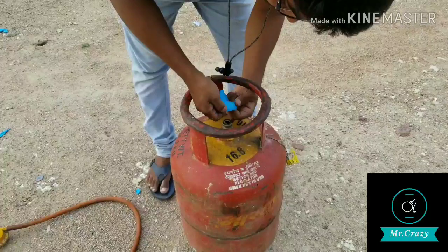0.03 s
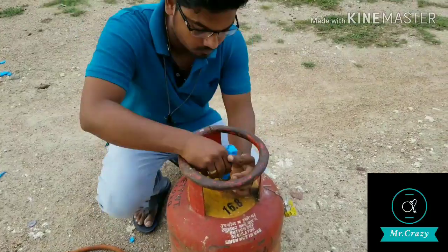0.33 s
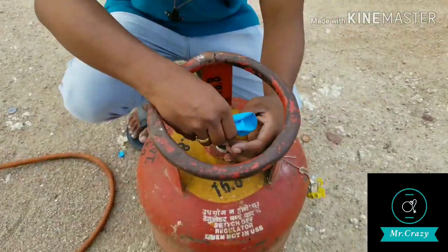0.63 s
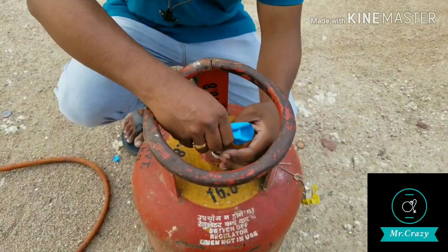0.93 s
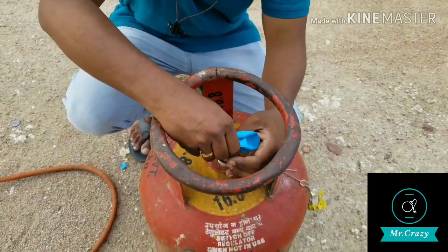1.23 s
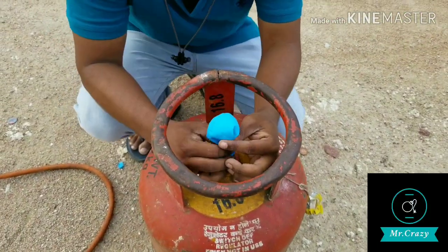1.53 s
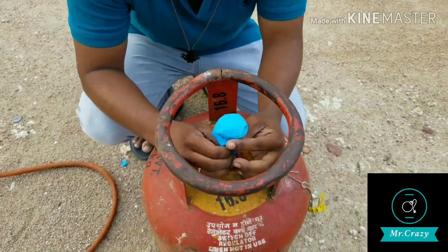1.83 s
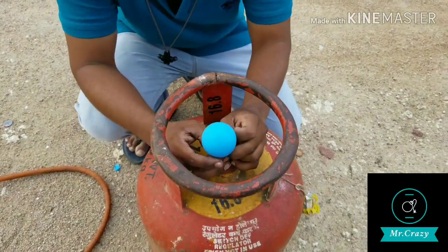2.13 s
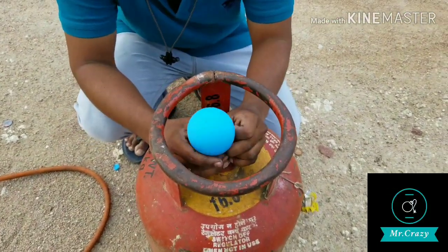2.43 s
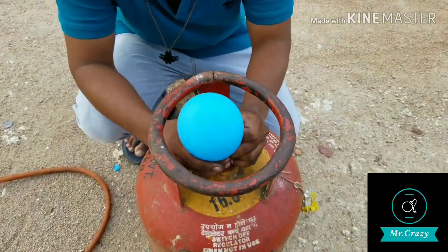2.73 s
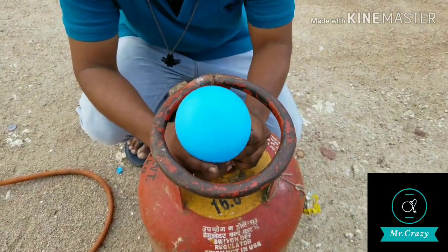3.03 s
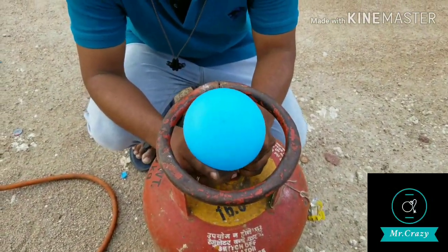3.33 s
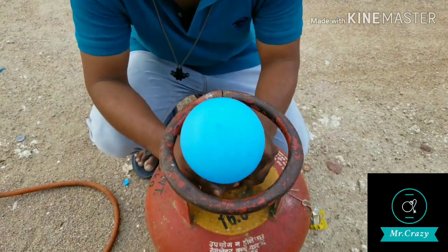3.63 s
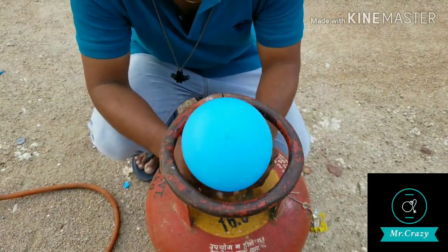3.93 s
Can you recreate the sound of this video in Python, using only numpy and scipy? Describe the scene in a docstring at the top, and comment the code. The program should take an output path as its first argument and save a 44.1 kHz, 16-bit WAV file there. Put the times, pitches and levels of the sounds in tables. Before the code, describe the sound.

A close, fluttering hiss of gas filling a balloon from a cylinder. It follows quiet finger clicks and short rubber rubs in the open air, with faint birds behind, and its resonance falls as the balloon swells.

```python
"""Outdoors, a rubber balloon is filled from a gas cylinder.
First, over low rumble, a distant wash and small birds, fingers stretch the balloon over the valve:
ticks, rustle and short rubs. Near 2.1 s the background fades briefly and returns with a far idling engine.
From 2.2 s the valve leaks; at 2.4 s it opens and a turbulent jet hisses into the balloon,
whose resonances sink as it swells."""
import sys
import numpy as np
from scipy import signal
from scipy.fft import rfft, irfft
from scipy.io import wavfile
from scipy.ndimage import uniform_filter1d

SR = 44100
rng = np.random.default_rng(int(sys.argv[2]) if len(sys.argv) > 2 else 0)


def bounce(signal):
    """Save signal as a 16-bit WAV file at the path given by the first command-line argument."""
    frames = np.transpose(np.atleast_2d(signal))
    limited = np.clip(frames, -1, 1)
    pcm = np.round(limited * 32767).astype(np.int16)
    wavfile.write(sys.argv[1], SR, pcm)


N = 176400
FFT_SIZE, HOP = 1024, 256
TIME_S = np.arange(N) / SR
FRAME_S = np.arange(N // HOP + 5) * HOP / SR
BIN_HZ = np.fft.rfftfreq(FFT_SIZE, 1 / SR)

# open air, distant wash: freq_hz, density_db
AIR_SPECTRUM = [(15, -37), (25, -33), (82, -0.5), (164, -1.5), (221, -5.5), (281, -15), (421, -24.5),
                (523, -28), (1200, -23.5), (1450, -24), (2700, -38), (4150, -30.5), (4870, -44),
                (6210, -40.5), (8580, -48), (10900, -48), (15500, -53.5)]
WASH_SPECTRUM = [(400, -26), (850, -6), (1200, 8.5), (1550, -9), (2000, 1), (2800, -35.5), (8000, -47)]
# open air, left to right: freq_hz, correlation
AIR_CORRELATION = [(60, 0.94), (180, 1), (550, 0.7), (1650, -0.4), (4970, -0.31), (15000, -0.54)]
# open air, its share below 160 Hz, wash, engine: time_s, gain_db
AIR_ENVELOPE = [(0, -2), (.35, -2), (.7, 0.5), (1.3, 1.5), (2.0, 0), (2.09, -6.5), (2.14, -28), (2.19, -16),
                (2.28, 3.5), (2.37, 3), (2.7, 0.5), (3.05, 0.5), (3.25, -5.5), (4.0, -4.5)]
RUMBLE_ENVELOPE = [(0, -0.5), (2.3, 2), (3.0, -0.5), (3.25, -25.5), (4.0, -13)]
WASH_ENVELOPE = [(0, -72.5), (.4, -64), (.63, -59), (.8, -63.5), (1.1, -67), (1.5, -73), (2.0, -71)]
ENGINE_ENVELOPE = [(2.15, -78.5), (2.3, -39.5), (2.7, -52.5), (3.05, -50.5), (3.25, -63.5), (4.0, -64)]
# engine tones: firing_multiple, gain_db
ENGINE_HARMONICS = [(2, -6), (3, -10.5), (4, -14.5), (5, -13.5), (6, -16.5)]
# rising bird notes: start_s, length_s, level_db, pitch_hz
BIRD_WHISTLES = [(0.112, 0.048, -62.5, 4100), (0.526, 0.077, -73, 3640), (0.595, 0.033, -60, 4130),
                 (0.824, 0.041, -61.5, 4090), (1.294, 0.047, -66, 4120), (1.52, .06, -71, 5410),
                 (1.527, .065, -64, 4110), (2.028, 0.038, -69, 4140)]
# falling bird notes: centre_s, level_db, pitch_hz
BIRD_CHIPS = [(.046, -64, 6500), (.068, -70, 3800), (.184, -64, 3750), (.475, -66, 4220),
              (.875, -61.5, 4440), (.90, -69, 6100), (.906, -64, 4450), (.975, -65, 4240),
              (1.015, -67, 5450), (1.178, -69, 3240), (1.203, -62.5, 3460), (1.476, -65, 5440),
              (1.493, -62, 3470), (1.835, -65, 3340), (1.863, -64, 3600), (1.893, -59, 3480),
              (1.908, -59, 3050)]

# rubber slips: start_s, length_s, level_db, ring_hz, ring_share, treble_db
RUBBER_SLIPS = [(1.337, 0.012, -44, 1170, 0.32, 4), (1.347, 0.013, -40, 4530, 0.03, 19),
                (1.367, 0.019, -39.5, 2000, 0.35, -10), (1.932, 0.02, -22.5, 3250, 0.25, 2),
                (1.942, 0.02, -40, 2960, 0.16, 13), (1.973, 0.017, -39, 1707, 0.25, -5)]
# fingers on the valve: start_s, level_db, t60_s
FINGER_TICKS = [(0.034, -43, 0.013), (0.283, -55, 0.029), (.303, -58, 0.033), (.318, -55, .025),
                (0.4935, -51, 0.023), (0.5176, -53.5, 0.016), (.562, -60, .015), (0.633, -63, .015),
                (.8959, -68, .015), (1.016, -62, .015), (1.106, -71, .015)]
# hands on rubber: time_s, level_db
RUSTLE_ENVELOPE = [(0, -73), (.2, -73), (.33, -62.5), (.42, -73.5), (.5, -71), (.7, -80), (.95, -73.5),
                   (1.1, -82), (1.45, -74), (1.7, -85), (1.9, -69.5), (2.0, -66)]
# handling noises: freq_hz, density_db
RUB_SPECTRUM = [(180, -56.5), (300, -28), (731, -34.5), (1640, -9.5), (2100, -15), (3340, -4.5),
                (3870, -2.5), (8140, -14.5), (9140, -24), (10400, -9.5), (15500, -13)]
TICK_SPECTRUM = [(300, -5), (1800, -0.5), (5500, 2), (9000, -10), (11500, -9), (15500, -21)]
RUSTLE_SPECTRUM = [(300, -19.5), (1500, 8), (3500, 5.5), (7000, 2), (9000, -37), (11000, -7.5),
                   (15500, -21.5)]

# jet strength, its treble shelf: time_s, gain_db
JET_ENVELOPE = [(2.2, -77), (2.225, -77), (2.258, -53), (2.33, -45.5), (2.378, -39), (2.395, -23),
                (2.412, -16), (2.63, -15), (2.69, -17.5), (2.75, -20), (2.87, -21.5), (2.96, -20),
                (3.04, -23), (3.2, -22.5), (3.26, -28), (3.33, -25.5), (3.38, -27), (3.5, -24.5),
                (3.69, -27), (3.72, -22), (3.76, -24.5), (3.82, -22), (3.91, -26.5), (3.96, -27),
                (4.0, -25)]
JET_TREBLE = [(2.25, -0.5), (2.37, -7), (2.42, -2.5), (2.5, -0.5), (2.62, 1.5), (2.69, -2.5), (2.76, -4),
              (3.0, -4), (3.2, -0.5), (3.35, 1.5), (3.68, 2.5), (3.8, 4), (4.0, 2.5)]
# hiss in the slack and taut balloon: freq_hz, density_db
SLACK_SPECTRUM = [(180, -62), (300, -31.5), (769, -20.5), (1280, -8.5), (1490, -5), (1780, -7.5),
                  (2440, -4.5), (2650, -4), (3280, -2.5), (4490, -4), (5660, -6), (6250, -3.5), (7250, -7),
                  (9140, -15), (11100, -1.5), (13600, -11), (15500, -5.5)]
TAUT_SPECTRUM = [(180, -54), (300, -26.5), (696, -22), (892, -14.5), (1590, -7.5), (2140, -0.5),
                 (2440, -5.5), (2930, -4.5), (3230, -5.5), (4140, -5.5), (5210, -9), (5570, -5.5),
                 (7370, -11.5), (8420, -20), (9930, -16), (11100, -6.5), (15500, -10.5)]
# rubber stretch: time_s, taut_fraction
BALLOON_STRETCH = [(2.4, 0), (2.62, 0), (2.76, 0.51), (3.05, 0.66), (3.3, 0.7), (4.0, 1)]
# strongest resonance of the enclosed gas: time_s, freq_hz
MAIN_MODE = [(2.37, 7330), (2.47, 6670), (2.55, 5870), (2.65, 5400), (2.8, 5076), (3.0, 4800), (3.2, 4540),
             (3.4, 4300), (3.6, 4110), (4.0, 3950)]
# balloon resonances: main_mode_ratio, width_hz, lift_db
BALLOON_MODES = [(.38, 161, 5), (0.509, 180, 4), (0.708, 200, 7.5), (0.862, 140, 6.5), (.935, 159, 1.5),
                 (1.0, 169, 10.5), (1.09, 180, 6), (1.19, 150, 5.5), (1.28, 160, 7), (1.37, 170, 6.5),
                 (1.46, 160, 3.5), (1.61, 180, 2.5), (1.7, 160, -6), (1.77, 200, 6), (1.95, 200, 3),
                 (2.14, 220, 2.5), (2.28, 220, 2)]
# passing peaks and a dip, sinking with the modes: centre_s, length_s, centre_hz, width_hz, lift_db
MODE_FLARES = [(2.31, 0.34, 2640, 200, 2.5), (2.305, .2, 3920, 300, -8), (2.425, 0.14, 3670, 300, 8.5),
               (2.432, 0.049, 7440, 400, 12), (2.473, 0.062, 4500, 250, 10), (2.712, 0.19, 4380, 302, 11),
               (2.98, 0.091, 6330, 400, 13), (3.02, 0.76, 4740, 161.3, 7), (3.3, .4, 5900, 200, 0.5),
               (3.507, 0.092, 4360, 298, 10.5), (3.78, 0.17, 4200, 300, 6.5),
               (3.814, 0.16, 4760, 200, 17.5), (3.824, 0.13, 5060, 220, 11), (3.99, 0.031, 4400, 400, 13.5)]
# peaks and notches of valve, collar and cupped hands: centre_hz, width_hz, lift_db
COLLAR_MODES = [(560, 250, 1), (900, 120, 2), (1370, 200, 3), (1640, 220, -4), (2170, 180, 4),
                (2400, 150, -5), (2900, 200, 2), (3170, 180, -3), (4050, 160, 2), (5170, 200, 2),
                (5700, 260, -6), (7200, 500, 2), (9100, 1200, -3), (10750, 600, 3), (13500, 900, -2)]
# hiss, left to right: freq_hz, correlation (clipped to 1)
HISS_CORRELATION = [(200, 4.8), (500, 0.6), (1000, 1.03), (2000, 0.44), (4000, 0.47), (7000, 0.24),
                    (12000, 0)]
# hiss balance: freq_hz, left_minus_right_db
HISS_BALANCE = [(60, 1.0), (99, 1.5), (160, 2.0), (270, 1.0), (450, 1.0), (740, 3), (1220, 3.2),
                (2010, 3.7), (3330, 7.4), (5500, 7), (9080, 4.5), (15000, 0.83)]
# hiss drift: time_s, left_minus_right_db
HISS_DRIFT = [(2.3, 1), (2.45, -0.5), (2.62, -.5), (2.75, 0), (3.0, -1), (3.3, -2), (4.0, -2.5)]


def amp(db):
    """Decibels to gain."""
    return 10 ** (np.asarray(db) / 20)


def unit(x):
    """Scale to rms 1."""
    return x / np.sqrt(np.mean(x ** 2) + 1e-20)


def at_time(table, time_s, outside=None):
    """Interpolate rows of time_s, value."""
    return np.interp(time_s, *np.transpose(table), left=outside, right=outside)


def at_freq(table, hz=BIN_HZ):
    """Interpolate rows of freq_hz, value on a log axis."""
    freq_hz, value = np.transpose(table)
    return np.interp(np.log(hz + 1), np.log(freq_hz + 1), value)


def add(mix, start_s, sound):
    """Mix a sound in at start_s."""
    part = mix[:, max(round(start_s * SR), 0):][:, :sound.shape[-1]]
    part += sound[..., :part.shape[1]]


def wobble(cutoff_hz):
    """Low-passed noise, rms 1."""
    rolloff = 1 + (np.fft.rfftfreq(N, 1 / SR) / cutoff_hz) ** 4
    return unit(irfft(rfft(rng.standard_normal(N)) / rolloff, N))


def noise(shape_db, correlation, pan_db, patch_db):
    """Steady stereo noise with random time-frequency patches; mid channel at rms 1."""
    a, b, c, d, patches = rng.standard_normal((5, len(FRAME_S), len(BIN_HZ)))
    patches = unit(uniform_filter1d(uniform_filter1d(patches, size=9, axis=0), size=9, axis=1))
    correlation = np.clip(correlation, -1, 1)
    left = a + 1j * b
    right = correlation * left + np.sqrt(1 - correlation ** 2) * (c + 1j * d)
    gain = amp(shape_db + patch_db * patches) * np.ones((2, 1, 1))
    gain /= np.sqrt((gain ** 2).mean((0, 2), keepdims=True))
    spectra = gain * np.array([left * amp(pan_db / 2), right * amp(-pan_db / 2)])
    x = signal.istft(spectra.transpose(0, 2, 1), nperseg=FFT_SIZE, noverlap=FFT_SIZE - HOP)[1][:, :N]
    return x / x.mean(0).std()


def burst(spectrum, samples, treble_db=0, correlation=0.56):
    """Short stereo noise with a 9 kHz shelf, rms 1."""
    hz = np.fft.rfftfreq(samples, 1 / SR)
    shape_db = at_freq(spectrum, hz) + treble_db * hz ** 4 / (hz ** 4 + 9000 ** 4)
    a, b = irfft(rfft(rng.standard_normal((2, samples))) * amp(shape_db), samples)
    return unit(np.array([a, correlation * a + np.sqrt(1 - correlation ** 2) * b]))


def open_air():
    """Low rumble and a distant wash near 1.2 kHz."""
    rumble_db = at_time(RUMBLE_ENVELOPE, FRAME_S)[:, None] / (1 + (BIN_HZ / 160) ** 6)
    air = noise(at_freq(AIR_SPECTRUM) + rumble_db, at_freq(AIR_CORRELATION), pan_db=2, patch_db=1.5)
    air *= amp(at_time(AIR_ENVELOPE, TIME_S) - 50.5)
    wash = noise(at_freq(WASH_SPECTRUM), correlation=0.36, pan_db=2, patch_db=2.5)
    return air + wash * amp(at_time(WASH_ENVELOPE, TIME_S, outside=-120))


def engine(firing_hz=51.4, waver=0.0033):
    """Distant idle: harmonics of a wavering firing rate."""
    cycles = np.cumsum(firing_hz * (1 + waver * wobble(5.5))) / SR
    hum = sum(amp(db) * np.sqrt(2) * np.sin(2 * np.pi * (k * cycles + rng.random()))
              for k, db in ENGINE_HARMONICS)
    return hum * amp(at_time(ENGINE_ENVELOPE, TIME_S, outside=-120) + 2 * wobble(8.5))


def chirp(length_s, level_db, pitch_hz, glide_hz):
    """One bird note: a sine gliding through pitch_hz."""
    progress = np.arange(0, length_s, 1 / SR) / length_s
    cycles = np.cumsum(pitch_hz + glide_hz * (progress - .5)) / SR
    return amp(level_db) * np.sqrt(2) * np.sin(np.pi * progress) * np.sin(2 * np.pi * cycles)


def birds(chip_s=0.012, fall_hz=600, twitter_notes=56, twitter_s=1.9):
    """Thin whistles, short chips and a faint, high twitter."""
    out = np.zeros((2, N))
    for start_s, length_s, level_db, pitch_hz in BIRD_WHISTLES:
        add(out, start_s, chirp(length_s, level_db, pitch_hz, glide_hz=132))
    for centre_s, level_db, pitch_hz in BIRD_CHIPS:
        add(out, centre_s - chip_s / 2, chirp(chip_s, level_db, pitch_hz, -fall_hz))
    for k, (late, loud, high) in enumerate(rng.uniform(-1.1, 1, (twitter_notes, 3))):
        start_s = (k + 1 + late / 2) * twitter_s / twitter_notes
        add(out, start_s, chirp(chip_s, -72 + 3 * loud, 5200 + 1000 * high, -fall_hz))
    return out


def scatter(x, echo_db=-4, t60_s=0.25):
    """Echoes off ground and trees blur a distant sound."""
    t = TIME_S[:SR // 4]
    tail = rng.standard_normal((2, len(t))) * amp(-60 * t / t60_s)
    tail /= np.linalg.norm(tail, axis=1, keepdims=True)
    return x + amp(echo_db) * signal.oaconvolve(x, tail, axes=1)[:, :N]


def rubs(wander_hz=316, overtone=0.29):
    """Rubber slips on the valve: friction noise plus an unsteady ring."""
    out = np.zeros((2, N))
    t = TIME_S[:2048]
    for start_s, length_s, level_db, ring_hz, share, treble_db in RUBBER_SLIPS:
        grit = burst(RUB_SPECTRUM, len(t), treble_db)
        wander = unit(uniform_filter1d(rng.standard_normal(len(t)), size=24))
        phase = 2 * np.pi * np.cumsum(ring_hz + wander_hz * wander) / SR
        ring = unit(np.sin(phase) + overtone * np.sin(2 * phase))
        swell = np.sin(np.pi * np.minimum(t / length_s, 1))
        add(out, start_s, amp(level_db) * swell * (np.sqrt(1 - share) * grit + np.sqrt(share) * ring))
    return out


def ticks():
    """Fingers tap the valve: fast-decaying noise bursts."""
    out = np.zeros((2, N))
    t = TIME_S[:2048]
    for start_s, level_db, t60_s in FINGER_TICKS:
        add(out, start_s, burst(TICK_SPECTRUM, len(t)) * amp(level_db - 60 * t / t60_s))
    return out


def rustle(flicker_db=3.6):
    """Hands brush the rubber: faint, flickering noise."""
    friction = noise(at_freq(RUSTLE_SPECTRUM), correlation=0.2, pan_db=0, patch_db=2.5)
    return friction * amp(at_time(RUSTLE_ENVELOPE, TIME_S, outside=-120) + flicker_db * wobble(150))


def peak(centre_hz, width_hz):
    """Resonance curve of height 1."""
    return 1 / (1 + (2 * (BIN_HZ - centre_hz) / width_hz) ** 2)


def ripple(position):
    """Random spectral peaks and dips, one value per unit of position, half shared by the channels."""
    shared, *sides = rng.standard_normal((3, FFT_SIZE))
    return np.array([np.interp(position, np.arange(FFT_SIZE), (shared + side) / np.sqrt(2))
                     for side in sides])


def hiss_spectrum_db(shelf_hz=5850, slack_ring=0.68, comb_hz=55, final_spacing_hz=100):
    """Balloon resonances sink as it swells; those of the collar stay put."""
    main_hz = at_time(MAIN_MODE, FRAME_S)[:, None]
    taut = at_time(BALLOON_STRETCH, FRAME_S)[:, None]
    db = (1 - taut) * at_freq(SLACK_SPECTRUM) + taut * at_freq(TAUT_SPECTRUM)
    db -= 10 * np.log10(1 + (200 / (BIN_HZ + 1)) ** 4)  # 200 Hz high-pass
    db += at_time(JET_TREBLE, FRAME_S)[:, None] / (1 + (shelf_hz / (BIN_HZ + 1)) ** 8)
    ringing = slack_ring + (1 - slack_ring) * np.minimum(2 * taut, 1)
    db += ringing * sum(lift_db * peak(k * main_hz, width_hz) for k, width_hz, lift_db in BALLOON_MODES)
    db += sum(lift_db * peak(hz, width_hz) for hz, width_hz, lift_db in COLLAR_MODES)
    for centre_s, length_s, hz, width_hz, lift_db in MODE_FLARES:
        swell = np.exp(-(2 * (FRAME_S[:, None] - centre_s) / length_s) ** 2)
        db += lift_db * swell * peak(hz * main_hz / at_time(MAIN_MODE, centre_s), width_hz)
    spacing_hz = final_spacing_hz * main_hz / MAIN_MODE[-1][1]
    weak_modes_db = 2.8 * ripple(BIN_HZ / spacing_hz)
    comb_db = 1.8 * ripple(BIN_HZ[None] / comb_hz)  # reflections off hands, collar and tank
    return db + (weak_modes_db + comb_db) * BIN_HZ / (BIN_HZ + 1000)


def spits(rate_per_s=350, spread_db=8, decay_s=0.0012):
    """The jet spits: tiny random bursts, rms 1."""
    impulses = (rng.random(N) < rate_per_s / SR) * amp(spread_db * np.minimum(rng.exponential(1, N), 4))
    t = TIME_S[:256]
    grain = burst(SLACK_SPECTRUM, len(t)) * np.exp(-t / decay_s)
    return unit(signal.oaconvolve(impulses[None], grain, axes=1)[:, :N])


def gas_jet(flutter_db=0.84, flutter_hz=35.2, sputter_db=0.5, sputter_hz=910, spit_db=-22.5):
    """Turbulent gas hisses through collar and balloon, fluttering and spitting."""
    hiss = noise(hiss_spectrum_db(), at_freq(HISS_CORRELATION), at_freq(HISS_BALANCE), patch_db=1.62)
    hiss *= amp(flutter_db * wobble(flutter_hz) + sputter_db * wobble(sputter_hz))
    pan = amp(at_time(HISS_DRIFT, TIME_S) * np.array([[.5], [-.5]]))
    flow = amp(at_time(JET_ENVELOPE, TIME_S)) * (TIME_S > JET_ENVELOPE[0][0])
    return (hiss + amp(spit_db) * spits()) * pan * flow


def scene():
    """Stereo mix; hands 4 dB to the left."""
    gas = gas_jet()
    hands = (rubs() + ticks() + rustle()) * amp([[2], [-2]])
    return gas + hands + scatter(birds()) + open_air() + engine()


def record(dry, ceiling=0.88, cutoff_hz=15700):
    """Soft peak limiter, then low-pass."""
    limited = dry / (1 + (dry / ceiling) ** 8) ** (1 / 8)
    lowpass = signal.firwin(511, cutoff_hz, window=("kaiser", 9), fs=SR)
    return signal.oaconvolve(limited, lowpass[None], "same")


dry = scene()
out = record(dry)
bounce(out)
```